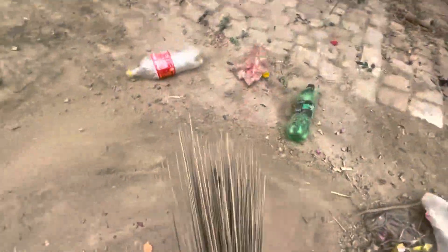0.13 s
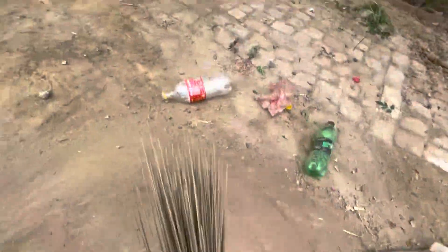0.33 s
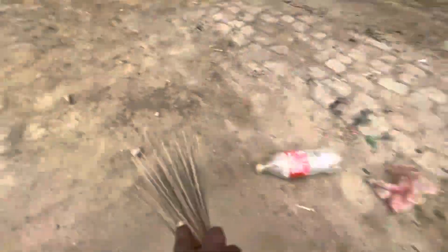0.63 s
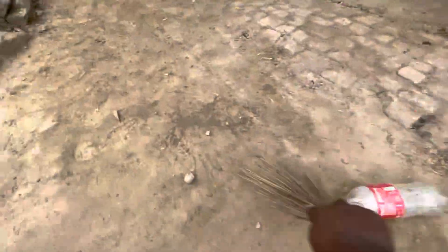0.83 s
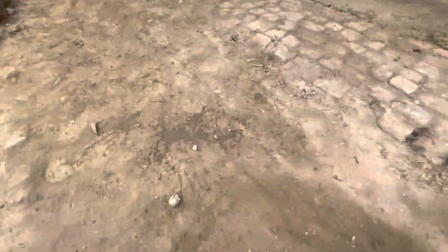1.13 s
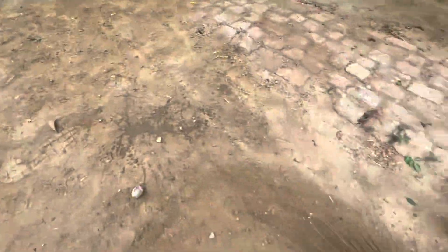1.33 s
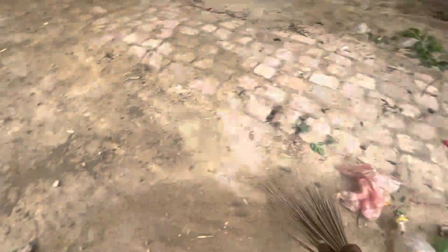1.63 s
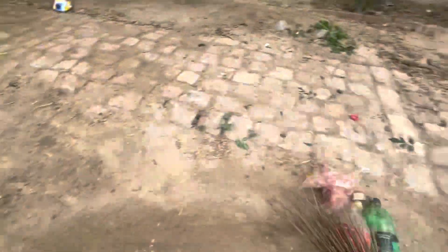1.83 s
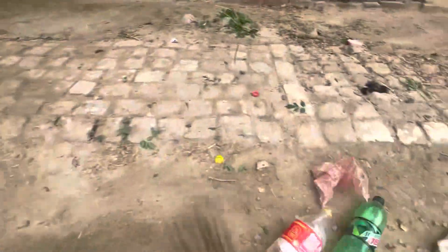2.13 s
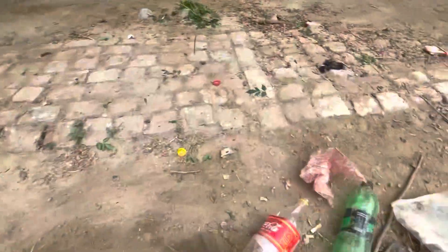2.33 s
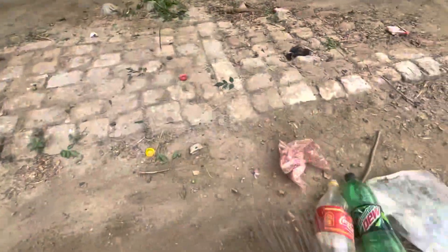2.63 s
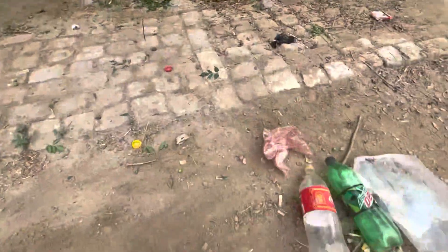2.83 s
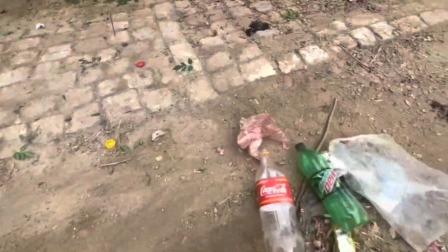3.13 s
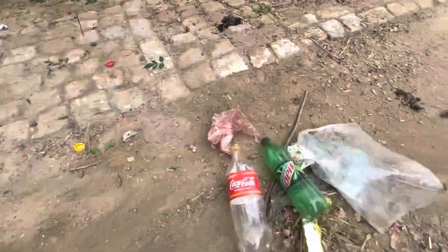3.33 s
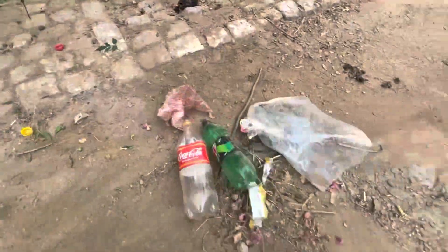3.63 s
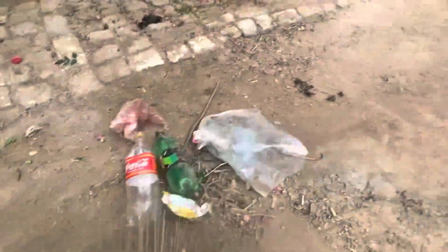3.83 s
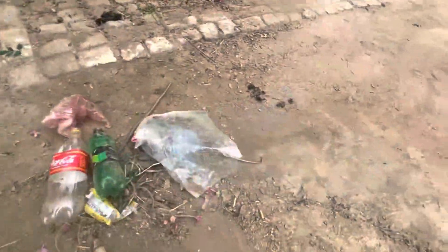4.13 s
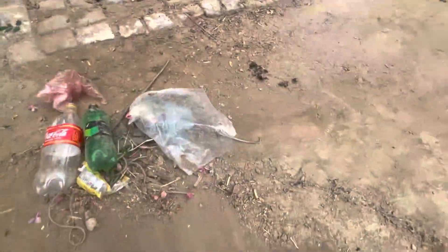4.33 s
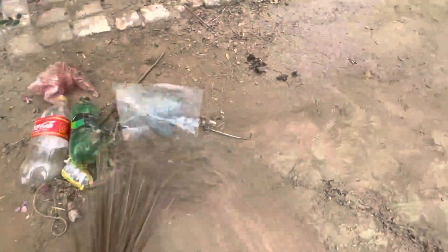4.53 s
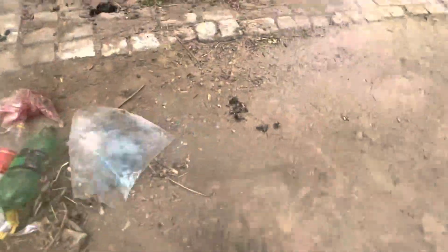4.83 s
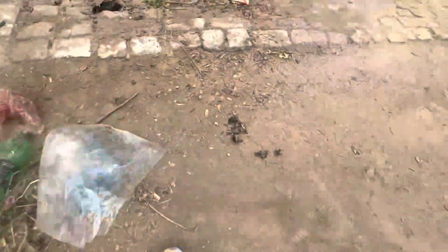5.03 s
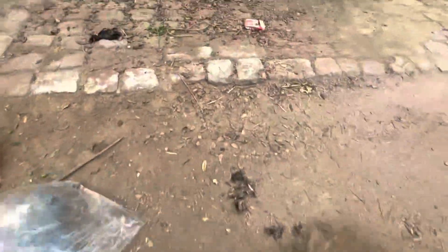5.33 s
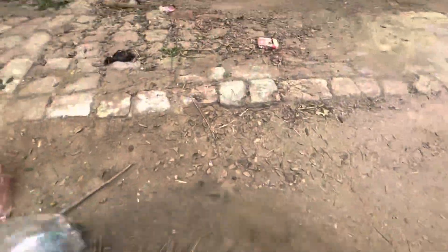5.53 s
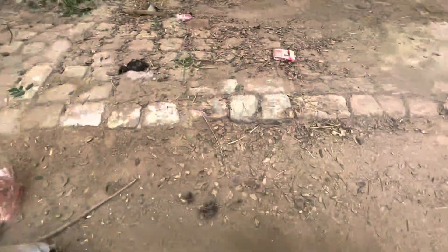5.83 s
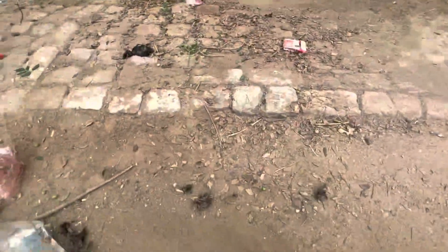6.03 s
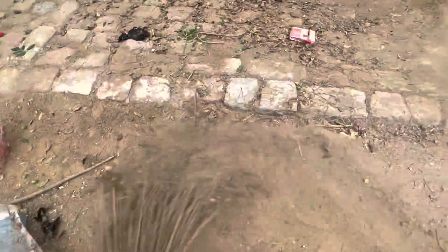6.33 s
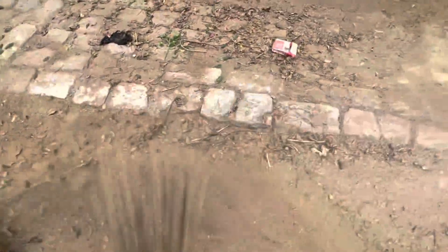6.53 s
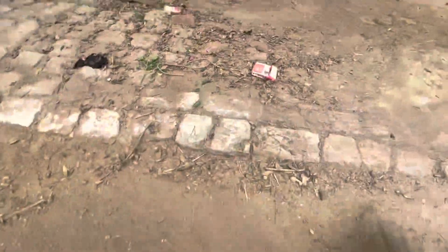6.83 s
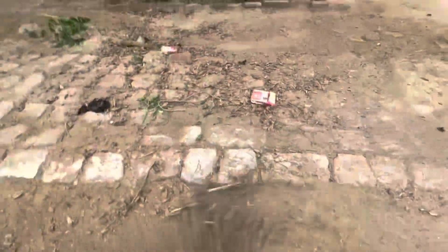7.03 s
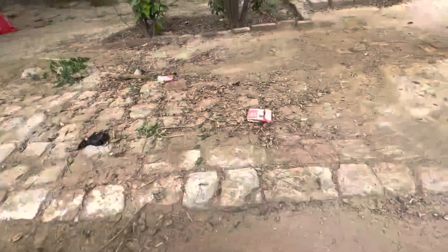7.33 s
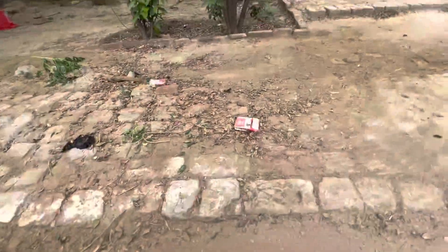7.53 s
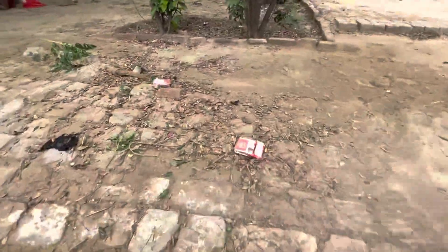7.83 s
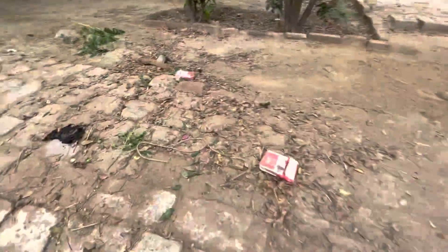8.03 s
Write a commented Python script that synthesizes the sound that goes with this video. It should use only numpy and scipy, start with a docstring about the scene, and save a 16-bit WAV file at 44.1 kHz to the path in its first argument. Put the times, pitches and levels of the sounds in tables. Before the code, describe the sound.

Close stereo, outdoor yard with low soft rumble, faint wavering drone and a slight breeze. At 0 s the broom barely touches; a dull footfall and small scuff come near 0.15 s. A soft growing sweep starts at 0.8 s, and from 0.95 to 1.5 s sticks rap an empty plastic bottle, hollow and crinkly. A second sweep at 1.6 s brings a denser run of bottle knocks around 1.8-2.1 s; another from 2.3 s adds a few to 2.6 s. At 2.9 s a short stroke ends in a sharp clack near 3.06 s. Louder, brighter, raspy strokes follow at 3.5, 4.2, 5.2, 6.1 and 6.8 s, scattering grit and rattling twigs, strongest around 4.5 s, with debris often flung left. Light scuffs fall near 5.06, 5.95 and 7.8 s. After a quieter gap, a final abrupt bright scratch begins at 8.0 s and is cut off.

```python
"""In a dirt and brick courtyard a stiff stick broom sweeps past two close microphone ports in eleven strokes.
Stick-slip friction of the tips makes hiss and rasp; tumbling grit and struck twigs ring as damped modes.
Knocked plastic bottles ring by shell, body and neck air; soles thud and scuff as shaped noise bursts.
Scattered noise tails answer from the yard, over low outdoor rumble, a faint gliding drone and a breeze."""
import sys
import numpy as np
from scipy import signal
from scipy.fft import rfft, irfft
from scipy.io import wavfile
from scipy.ndimage import uniform_filter1d

SR = 44100
rng = np.random.default_rng(int(sys.argv[2]) if len(sys.argv) > 2 else 0)


def output_pcm(signal):
    """Save a mono or channel-first signal as 16-bit PCM at the path in sys.argv[1].

    Samples are clipped to [-1, 1] before scaling.
    """
    pcm = np.clip(np.atleast_2d(signal).T, -1, 1) * 32767
    wavfile.write(sys.argv[1], SR, np.round(pcm).astype(np.int16))


N = 361179
TIME = np.arange(N) / SR
# Levels in the tables are relative: the functions may add offsets of their own.


def from_db(db):
    """Logarithmic level: decibels become an amplitude gain."""
    return 10 ** (np.asarray(db) / 20)


def rms_one(x):
    """Power normalisation: scale to unit mean square."""
    return x / np.sqrt(np.mean(x ** 2) + 1e-20)


def in_time(rows):
    """Linear interpolation: each column of a curve at every sample."""
    s, *columns = np.transpose(rows)
    return [np.interp(TIME, s, c) for c in columns]


def drift(rate):
    """Band-limited random wander: about `rate` knots a second, spread about 1."""
    knots = rng.standard_normal(4096)
    return np.interp(TIME * rate, np.arange(len(knots)), knots) / np.sqrt(2 / 3)


def coloured(x, spectrum):
    """Minimum-phase filtering: the folded cepstrum gives a causal filter with the given spectrum."""
    size = 2 ** 19
    hz, db = np.transpose(spectrum)
    grid = np.maximum(np.fft.rfftfreq(size, 1 / SR), 1)
    gain = from_db(np.interp(np.log(grid), np.log(hz), db))
    cepstrum = irfft(np.log(gain))
    cepstrum[1:size // 2] *= 2
    cepstrum[size // 2 + 1:] = 0
    response = np.exp(rfft(cepstrum))
    return irfft(rfft(x, size) * response)[..., :N]


def ring(x, hz, t60):
    """Damped resonance: a unit click sets one decaying sine of initial height 1 ringing."""
    r = from_db(-60 / (t60 * SR))
    w = 2 * np.pi * hz / SR
    return signal.lfilter([0, np.sin(w)], [1, -2 * r * np.cos(w), r * r], x + 1e-18)


CONTACT_RISE_S = 0.00025


def burst(t60, size=8192):
    """Impact noise: a cluster of tiny contacts builds up at once to about rms 1 and decays."""
    t = np.arange(size) / SR
    rise = 1 - np.exp(-t / CONTACT_RISE_S)
    return rng.standard_normal(size) * from_db(-60 * t / t60) * rise


def add(track, s, sound):
    """Superposition: lay a sound into a track at a time."""
    start = int(np.clip(round(s * SR), 0, N - 1))
    track[start:start + len(sound)] += sound[:N - start]


def grains(per_s, spread_db, t60):
    """Granular friction: random catches of uneven size, each a tiny dying crunch; rms 1."""
    sizes = from_db(spread_db * np.minimum(rng.exponential(1, N), 4))
    power = (rng.random(N) < per_s / SR) * sizes ** 2
    power = signal.lfilter([1], [1, -from_db(-120 / (t60 * SR))], power + 1e-18)
    return rms_one(np.sqrt(power) * rng.standard_normal(N))


def spells(rows, rise_s, fall_s):
    """Contact envelope: gain of short rubs that set in, hold and die away."""
    out = np.zeros(N)
    for s, length_s, db in rows:
        age = np.maximum(TIME - s, 0)
        onset = np.minimum(age / rise_s, 1)
        release = np.exp(-np.clip((age - length_s) / fall_s, 0, 20))
        out += from_db(db) * onset * release
    return out


# broom strokes: touch-down t/s, time to full pressure t/s, time held t/s, time until litter is met t/s,
# scratch level/dB, attenuation at touch-down level/dB, rasp re scratch level/dB, grit level/dB,
# jump on meeting the litter level/dB, fade after lifting dB/s,
# starting place (0 ahead, 1 right; limited to these), swing in places/s (positive is to the right)
STROKES = [(0.0, 0.014, 0.062, 0.008, -49, -50.5, 0.5, -47.5, -16, 44, 0.27, 1),
           (0.797, 0.33, 0.41, 0.18, -31, 1.5, -6, -31, 13.5, 26, 1.64, 1.5),
           (1.565, 0.27, 0.18, .15, -24.5, 9.5, -19, -26, 20, 29, 1, -0.5),
           (2.271, .16, 0.19, 0.13, -25.5, 16.5, -9, -23.5, 19.5, 73, 0.2, 2),
           (2.909, 0.092, 0.14, 0.14, -25.5, 21, 3, -37, 11, 90, 0.21, 1.8),
           (3.512, 0.088, 0.22, 0.23, -16, 9.5, -1, -32.5, 7, 67, 1.15, -4),
           (4.22, 0.21, 0.14, 0.29, -13.5, 14, -0.5, -21, 19, 49.5, 0.41, -1),
           (5.176, 0.26, 0.31, 0.4, -21.5, 6, 0, -30, 2.5, 23, 1.02, -3.5),
           (6.068, .13, 0.34, 0.41, -17.5, 7.5, -6, -35.5, 0, 34, 1.26, -5),
           (6.826, 0.17, 0.39, 0.39, -18, 14.5, -3.5, -30.5, 5.5, 65, 1.15, -4.5),
           (8.016, 0.13, .1, 0.04, -11, 17.5, -22, -43.5, -1, 55, 1.7, 5)]
# tips grazing the ground on the way back: t/s, grit level/dB, t60 t/s
GRAZES = [(0.46, -48, 0.99), (3.325, -43, 0.67), (5.055, -34.5, 0.35), (5.119, -34, 0.093),
          (5.948, -51, 0.53), (7.864, -49, 1)]
GRAZE_SCRATCH_DB = -30   # relative to its grit
LAND_S, EASE_DB_PER_S = 0.032, 48   # the tips land; the pressure eases while the stroke is held
LIFT_DB, LIFT_S = 7.5, 0.043   # the scratch drops as the broom lifts, then fades
GATHER_DB_PER_S, SPILL_DB_PER_S, SETTLE_DB_PER_S = 51.5, 41, 51.5   # grit heaps up, spills aside, comes to rest
RASP_FOLLOWS = 0.74   # share of the heap's level change that bends the sticks


def strokes():
    """Friction follows load: each stroke lands, presses, meets litter and lifts; three gains and the place."""
    scratch, rasp, pushed, place = np.full((4, N), 1e-5)
    for (s, press_s, hold_s, litter_s, db, swell_db, rasp_db, grit_db,
         jump_db, fade_db_per_s, start, swing) in STROKES:
        age = np.maximum(TIME - s, 0)
        landed = np.sin(np.pi / 2 * np.minimum(age / LAND_S, 1)) ** 2
        lifted = np.maximum(age - press_s - hold_s, 0)
        lift_db = LIFT_DB * (1 - np.exp(-lifted / LIFT_S))
        swelling_db = -swell_db * np.maximum(1 - age / press_s, 0)
        easing_db = -EASE_DB_PER_S * np.clip(age - press_s, 0, hold_s)
        pressure_db = swelling_db + easing_db - lift_db - fade_db_per_s * lifted
        # time left before the litter is met, and time spent pushing it
        ahead = np.maximum(litter_s - age, 0)
        past = np.maximum(age - lifted - litter_s, 0)
        heap_db = -GATHER_DB_PER_S * ahead - jump_db * np.minimum(ahead / 0.021, 1) - SPILL_DB_PER_S * past
        scratch += landed * from_db(db + pressure_db)
        rasp += landed * from_db(db + pressure_db + rasp_db + RASP_FOLLOWS * heap_db)
        pushed += landed * from_db(grit_db + heap_db - 0.59 * lift_db - SETTLE_DB_PER_S * lifted)
        place = np.where(TIME >= s, np.clip(start + swing * age, 0, 1), place)
    for s, db, t60 in GRAZES:
        age = np.maximum(TIME - s, 0)
        graze = np.minimum(age / 0.0033, 1) * from_db(db - 60 * age / t60)
        pushed += graze
        scratch += graze * from_db(GRAZE_SCRATCH_DB)
    return scratch, rasp, pushed, uniform_filter1d(place, size=900)


# tips digging in (positive) or skimming (negative): t/s, half width t/s, level/dB
SURGES = [(0.85, 0.025, 2.5), (1.6, 0.041, -4), (3.53, 0.022, -2.5), (3.02, 0.028, -2.5),
          (3.63, 0.016, 2.5), (4.355, 0.041, 3), (4.42, 0.026, -3), (5.51, 0.025, 4), (6.24, 0.023, 2.5),
          (7.015, 0.031, 3), (8.09, .025, 2), (8.15, .035, -1)]


def surges():
    """Load modulation: gain of the broom where the tips dig in for a moment or skim lightly."""
    return from_db(sum(db * np.exp(-((TIME - s) / width_s) ** 2) for s, width_s, db in SURGES))


# spectrum of tips hissing over dust: f/Hz, level/dB
SCRATCH = [(150, -53), (500, -33), (1000, -21), (1900, -13.5), (2700, -12), (4200, -11), (5800, -7),
           (7600, -8), (8700, -1), (9500, 3.5), (10600, -4), (12000, -11), (13700, -30), (15800, -25.5)]
# spectrum of the rasp of bending sticks: f/Hz, level/dB
RASPING = [(150, -59), (600, 0), (1300, -0.5), (2000, 9.5), (3300, -2.5), (5000, 10.5), (7000, 4.5),
           (9500, 6.5), (12000, -17), (15000, -28)]


def stick_tips(scratch, rasp):
    """Stick-slip friction: the tips hiss finely on the dust and judder more coarsely where the sticks bend."""
    per_s = 2200 * (scratch * from_db(23.5)) ** 0.91   # more tips catch as the stroke bears down
    evenness = np.sqrt(np.mean(per_s) / per_s)   # keeps the power level when catches are many or few
    slips = evenness * grains(per_s, spread_db=2.0, t60=0.0051)
    slips = slips + from_db(-2.0) * rng.standard_normal(N)
    hiss = rms_one(coloured(slips, SCRATCH)) * from_db(1.0 * drift(70))
    judders = rms_one(coloured(grains(700, spread_db=4.0, t60=0.0038), RASPING))
    judders = judders * from_db(5.1 * drift(45))
    return (scratch * hiss + rasp * judders) * from_db(-1.5 + 1.86 * drift(35))


# tips skidding hard: t/s, length t/s, level/dB
SKIDS = [(2.377, 0.051, -36), (3.052, 0.015, -20), (6.26, 0.022, -23), (7.31, 0.032, -33)]
# spectrum of a skidding tip: f/Hz, level/dB
SCREECH = [(500, -25), (2000, -5), (4000, -8.5), (6800, 10), (9000, 8), (13000, -43)]


def skids():
    """Stick-slip under heavy load: a few tips judder across a stone or bottle with a sharp, bright scratch."""
    judder = rms_one(coloured(grains(460, spread_db=4.0, t60=0.009), SCREECH))
    return judder * spells(SKIDS, rise_s=0.0046, fall_s=0.0027)


# spectrum of a snagging tip: f/Hz, level/dB
SNAG = [(300, -25), (1000, -11), (2000, 2), (3300, -4.5), (6000, 0), (9000, 8.5), (12000, -17),
        (15500, -12)]
SNAGS_PER_S, SNAG_DB = 90, -17
SNAG_FOLLOWS = 0.8   # share of the scratch's swing in dB


def twig_snags(scratch):
    """Elastic release: single stiff tips snag on crumbs and let go in dry cracks that stand out of the hiss."""
    cracks = rms_one(coloured(grains(SNAGS_PER_S, spread_db=2.5, t60=.0035), SNAG))
    return cracks * from_db(SNAG_DB) * scratch ** SNAG_FOLLOWS


# spectrum of a stray tick: f/Hz, level/dB
STRAY = [(150, -20), (700, 10), (1500, -16), (3500, -5), (6000, -36), (9000, 6), (12000, -6), (15000, -16)]
STRAY_PER_S, STRAY_DB = 36, -35.5
STRAY_FOLLOWS = 0.7   # share of the scratch's swing in dB


def strays(scratch):
    """Sparse random impacts: stray sticks and crumbs tick singly and stand out as the stroke trails away."""
    ticks = rms_one(coloured(grains(STRAY_PER_S, spread_db=-1.0, t60=0.012), STRAY))
    return ticks * from_db(STRAY_DB) * scratch ** STRAY_FOLLOWS


# single sticks flicking free: t/s, level/dB
FLICKS = [(0.7987, -36.5), (0.947, -20), (0.9592, -22), (1.478, -35.5), (1.798, -19), (1.8408, -21),
          (2.2727, -30.5), (2.373, -29), (2.512, -21), (2.913, -37.5), (2.9653, -23), (3.047, -28),
          (3.094, -31), (3.621, -20), (3.737, -21), (4.0145, -31), (4.09, -47), (4.111, -36.5),
          (5.121, -35), (5.179, -32.5), (6.074, -28.5), (6.194, -20.5), (6.221, -28), (6.621, -30),
          (6.745, -30.5), (7.57, -30.5)]


def flicks():
    """Elastic release: a bent stick springs free with a bright tick."""
    out = np.zeros(N)
    for s, db in FLICKS:
        add(out, s, from_db(db + 15.5) * burst(t60=0.024))
    return coloured(out, SCRATCH)


# spectrum of tumbling grit: f/Hz, level/dB
GRIT = [(80, -21.5), (250, -0.5), (480, -8.5), (800, -2.5), (1200, -2), (2000, 1), (3200, -7), (5000, -6.5),
        (9000, -10), (15000, -104)]


def grit():
    """Random impacts on small resonators: crumbs and chaff crunch, and hits ring at one of 24 pitches."""
    pitches = np.geomspace(450, 4200, num=24)
    sizes = from_db(3.9 * np.minimum(rng.exponential(1, N), 4)) * rng.choice([-1, 1], N)
    hits = sizes * (rng.random(N) < 600 / SR)
    dealt = rng.integers(0, len(pitches), N)   # which pitch each hit excites
    pings = sum(ring(hits * (dealt == k), hz, 18 / hz) * np.sqrt(hz) for k, hz in enumerate(pitches))
    crunch = grains(450, spread_db=3.5, t60=0.036)
    rattle = rms_one(coloured(crunch + from_db(-7.5) * rms_one(pings), GRIT))
    return rattle * from_db(1 + 2.4 * drift(25))


# twigs, pebbles and litter struck by the broom, and one low knock of a foot (5.706 s): t/s, ring level/dB,
# centre of the modes f/Hz, snap level/dB
CLACKS = [(0.171, -34.5, 1360, -54), (0.549, -41, 1130, -39.5), (1.198, -28.5, 2590, -38),
          (1.298, -35, 1320, -22), (1.313, -32, 1470, -23.5), (1.33, -33, 1440, -27.5),
          (1.383, -35, 730, -27.5), (1.703, -34, 2780, -26.5), (2.377, -36, 935, -21.5),
          (2.79, -42.5, 617, -32), (3.058, -18, 1503, -16), (3.069, -14.5, 1535, -20),
          (3.326, -26, 1700, -26), (3.728, -27.5, 988, -37), (3.823, -21.5, 1330, -19.5),
          (3.835, -20.5, 1020, -38), (3.867, -52, 1070, -18.5), (3.922, -50, 2000, -18.5),
          (3.93, -22.5, 950, -45), (3.935, -22, 724, -48), (4.015, -32, 1130, -28.5),
          (4.486, -37, 1590, -13.5), (4.527, -10.5, 1040, -33), (4.543, -13, 1390, -16),
          (4.612, -13.5, 1080, -25), (4.755, -34, 754, -20.5), (5.504, -16, 1815, -35),
          (5.539, -20, 1790, -33), (5.579, -19, 2030, -38), (5.685, -26.5, 1840, -45),
          (5.706, -32, 262, -46), (5.732, -27, 2400, -27), (5.917, -36, 1760, -42),
          (6.311, -30.5, 1620, -42), (6.591, -37, 320, -30.5), (5.954, -36, 1730, -25.5),
          (6.413, -26, 1610, -51), (6.44, -27.5, 1050, -32), (6.721, -50, 1520, -35.5),
          (7.171, -29.5, 566, -52), (7.208, -23.5, 965, -38), (7.277, -26, 1200, -38),
          (7.57, -35, 2100, -40), (7.355, -31, 794, -21.5), (7.795, -36, 1520, -29.5),
          (7.865, -35.5, 635, -43), (7.885, -42, 700, -52)]
# spectrum of the snap: f/Hz, level/dB
SNAP = [(100, -9), (400, -4.5), (900, -3), (2000, 2.5), (4000, -2.5), (9000, -4.5), (15000, -75)]


def clacks():
    """Damped modal cluster: a struck twig or scrap snaps, then rattles briefly on seven modes."""
    rings, snaps = np.zeros(N), np.zeros(N)
    for s, db, hz, snap_db in CLACKS:
        octaves = np.linspace(-.45, .65, num=7) + rng.normal(0, 0.08, 7)
        body = sum(ring(burst(t60=.008), hz * 2 ** o, .024) * from_db(-18 * abs(o)) for o in octaves)
        body = np.diff(body, prepend=0)   # tilts towards the treble
        add(rings, s, from_db(db + 8) * body / np.max(np.abs(body)))
        add(snaps, s, from_db(snap_db + 6.5) * burst(t60=0.034))
    return rings + coloured(snaps, SNAP)


# lumps of earth rolling, and a sole shifting now and then: t/s, length t/s, level/dB
CLODS = [(0.545, 0.0091, -56), (0.69, 0.12, -56), (3.325, .012, -40), (3.36, 0.017, -56),
         (5.915, 0.0078, -48), (3.62, 0.027, -44), (3.73, 0.13, -43), (4.73, 0.08, -41), (5.54, 0.059, -45),
         (6.27, 0.25, -52), (7.172, 0.018, -29.5), (7.21, 0.15, -42.5)]
# spectrum of a lump of earth: f/Hz, level/dB
CLOD = [(80, -16.5), (200, 2.5), (380, -4.5), (600, 0), (1000, -17), (3000, -28)]


def clods():
    """Rolling contact: lumps of earth are nudged and roll, or a sole shifts, with a dull rumble."""
    tumble = rms_one(coloured(grains(160, spread_db=0.5, t60=0.052), CLOD))
    return tumble * spells(CLODS, rise_s=0.0091, fall_s=0.0099)


# knocks on bottles: t/s, shell level/dB, neck air level/dB, body level/dB, pitch of the spot struck f/Hz
KNOCKS = [(0.953, -14.5, -73, -59, 1070), (1.034, -10, -44, -28.5, 415), (1.099, -40, -43, -38, 270),
          (1.13, -17.5, -50, -34, 270), (1.239, -22, -57, -66, 1020), (1.423, -26, -49, -51, 675),
          (1.445, -22, -58, -38, 276), (1.481, -22, -38, -21, 273), (1.758, -35, -46, -35, 630),
          (1.815, -11.5, -42, -25.5, 807), (1.873, -7, -59, -24.5, 905), (1.936, -6, -30.5, -17, 1140),
          (1.946, -11.5, -51, -37, 766), (2.051, -22, -36.5, -47, 980), (2.084, -20, -36.5, -29, 970),
          (2.213, -23.5, -45, -36.5, 1142), (2.442, -18, -38.5, -27, 770), (2.512, -11, -29, -24, 714),
          (2.628, -24, -34, -37, 434)]
# modes of an empty plastic bottle (neck air, three of the body, then shell): f/Hz, level/dB, t60 t/s
BOTTLE_MODES = [(110, 1.5, .6), (272, -6, .1), (370, -7, .06), (430, -2, .075), (660, -17, .035),
                (765, -11, .07), (980, -12, .035), (1140, -12, .022), (1410, -12, .025), (1680, -13, .02),
                (2040, -13, .015), (2450, -13, .015), (3240, -12, .015), (3900, -15, .012)]
# spectrum of the shell skidding on grit: f/Hz, level/dB
SKID = [(100, -27), (300, -18), (750, 7), (1200, 13), (2000, 21), (3400, 13.5), (6000, 11), (15000, -71)]
SPOT_DB, SPOT_OCTAVES = 11, 0.13   # modes near the pitch of the spot ring louder


def bottles():
    """Modal and cavity resonance: each knock rings the shell, flexes the body and sets the neck air booming."""
    out, crinkle = np.zeros(N), np.zeros(N)
    click = signal.unit_impulse(SR)
    for s, shell_db, neck_db, body_db, spot_hz in KNOCKS:
        luck = rng.standard_normal((len(BOTTLE_MODES), 2))
        for k, (hz, mode_db, t60) in enumerate(BOTTLE_MODES):
            if k == 0:
                part_db = neck_db + 8.0
            elif k < 4:
                part_db = body_db + 3.0
            else:
                part_db = shell_db + 2 * luck[k, 0]
            part_db += SPOT_DB * np.exp(-(np.log2(hz / spot_hz) / SPOT_OCTAVES) ** 2)
            # dents shift the pitch of body and shell, not of the air
            dent = 1 + .022 * luck[k, 1] * (k > 0)
            add(out, s, (-1) ** k * from_db(part_db + mode_db) * ring(click, hz * dent, t60))
        # the shell skids on over the grit after the knock
        skidding = burst(t60=0.044) + from_db(-10.5) * burst(t60=0.059)
        add(crinkle, s, from_db(shell_db - 19.5) * skidding)
    # no deep bass below the boom of the neck
    no_bass = signal.butter(2, 85, "high", fs=SR, output="sos")
    return signal.sosfilt(no_bass, out + coloured(crinkle, SKID))


# the broom shoving the bottles: t/s, length t/s, level/dB
SHOVES = [(0.943, 0.038, -21.5), (1.0, 0.14, -39), (1.71, 0.073, -38), (1.797, 0.089, -21),
          (1.96, .03, -40), (2.375, 0.063, -25), (2.5, 0.073, -27.5), (3.04, 0.053, -31)]
# spectrum of a stick on thin plastic: f/Hz, level/dB
RAP = [(150, -33), (520, -12), (720, 7.5), (950, 7), (1500, -3), (3000, 4), (6000, -3), (9000, -1),
       (14000, -29)]


def patter():
    """Repeated impact: sticks rap on the thin plastic while the broom shoves the bottles along."""
    raps = grains(200, spread_db=2.6, t60=.0035)
    return rms_one(coloured(raps, RAP)) * spells(SHOVES, rise_s=0.0037, fall_s=0.0094)


# shoe scuffs: t/s, length t/s, level/dB
SCUFFS = [(0.158, 0.027, -46.5), (0.52, 0.041, -54), (5.055, 0.028, -37.5), (5.948, 0.05, -41.5),
          (7.776, 0.019, -33.5), (7.812, 0.014, -38), (7.895, 0.094, -53)]
# spectrum of a scuff: f/Hz, level/dB
SCUFF = [(150, -42), (600, -7), (1500, 6), (2200, -11), (2900, -6), (6000, -20), (9000, -7), (12000, -33)]


def scuffs():
    """Granular shear: a sole twists on the grit with a soft, dull crunch."""
    crunch = rms_one(coloured(grains(700, spread_db=4.0, t60=0.017), SCUFF))
    return crunch * spells(SCUFFS, rise_s=0.0089, fall_s=0.0054)


# footfalls on packed earth: t/s, level/dB
STEPS = [(0.126, -29.5), (0.144, -30), (5.707, -42)]
# spectrum of a footfall: f/Hz, level/dB
THUD = [(25, -27), (50, 5), (80, -0.5), (130, -1), (200, -18), (320, -29), (1000, -34), (4000, -56)]


def steps():
    """Soft impact: a sole thuds on the earth as a bass-heavy burst."""
    out = np.zeros(N)
    for s, db in STEPS:
        add(out, s, from_db(db + 25.5) * burst(t60=0.23))
    return coloured(out, THUD)


# phase lead of the left port over the right: f/Hz, phase/rad with the source right, ahead, left
LEADS = [(0, 0, 0, 0), (500, -1.6, -.4, 1.7), (1000, -2.4, -.5, 2.4), (2000, -2.7, -.6, 1.6),
         (2500, -3.9, -1.9, 2.1), (3150, -5.9, -3.3, 3.2), (3700, -7, -5, 1.9), (4300, -8.7, -6.3, .2),
         (5000, -10.3, -7.8, -.4), (6000, -12.5, -10.8, -3.7), (6700, -14.2, -13, -4.7),
         (7400, -14.3, -13.9, -7.4), (8400, -13.1, -13.1, -6.8)]
# balance: f/Hz, left re right level/dB with the source right, the same on the left, shading on the left level/dB
SIDES = [(150, 5.5, 0.71, -2), (880, -9, 8, 1), (1900, 0, 1.4, -1), (3030, 1.5, 0.55, -1.5),
         (4670, -6.5, 0.58, -3), (9800, 7.5, 0.45, -5)]


def at_ports(x, place, flung=0):
    """Interaural-style cues: phase lead and balance follow the place; while flung, all is heard from the left."""
    hz, s, frames = signal.stft(x, SR, nperseg=256, noverlap=128)
    to_left = np.interp(s, TIME, flung + np.zeros(N)) > .5
    place = np.clip(np.interp(s, TIME, place), -.3, 1.3)

    def at_bins(rows):
        """Linear interpolation: each column of a table at the frequency bins."""
        f, *columns = np.transpose(rows)
        return [np.interp(hz, f, c)[:, None] for c in columns]

    right, ahead, left = at_bins(LEADS)
    lead = np.where(to_left, left, ahead + (right - ahead) * place)
    pan_right, pan_left, shade = at_bins(SIDES)
    pan_db = np.where(to_left, pan_left, pan_right * place)
    heard = [frames * from_db(shade * to_left + side * pan_db / 2) * np.exp(1j * side * lead / 2)
             for side in (1, -1)]
    return signal.istft(np.array(heard), SR, nperseg=256, noverlap=128)[1][:, :N]


SCATTER_ABOVE_HZ = 400


def courtyard(x, t60, wet_db):
    """Diffuse scattering: ground and walls return a different short tail to each port; the bass escapes."""
    t = TIME[:SR // 2]
    tail = rng.standard_normal((2, len(t))) * from_db(-60 * t / t60) * (1 - np.exp(-t / 0.000083))
    tail /= np.sqrt(np.sum(tail ** 2, axis=1, keepdims=True))
    no_bass = signal.butter(2, SCATTER_ABOVE_HZ, "high", fs=SR, output="sos")
    scattered = signal.sosfilt(no_bass, x)
    return from_db(wet_db) * signal.fftconvolve(scattered[None], tail, axes=1)[:, :N]


# spectrum of the distant rumble: f/Hz, level/dB
YARD = [(20, -37), (50, -10), (90, 5.5), (150, -2.5), (260, -8.5), (500, -18), (1200, -22.5), (3000, -25.5),
        (6000, -30), (9000, -26.5), (11000, -62), (16000, -52)]
# a faint far-off drone: t/s, f/Hz, level/dB
DRONE = [(0, 208, -50.5), (.7, 164, -53.5), (1.4, 150, -49), (2.9, 186, -56), (3.5, 191, -54),
         (4.2, 203, -58.5), (5.2, 209.3, -54.5), (5.7, 161, -52), (7.1, 134.1, -56.5), (8.19, 151, -54)]
# air moving over the ports: t/s, level/dB
BREEZE = [(0.0, -52.5), (0.62, -68.5), (0.96, -88), (3.31, -68.5), (6.38, -66.5), (6.5, -70), (8.19, -66.5)]
# spectrum of the breeze: f/Hz, level/dB
WIND = [(15, -29), (28, -17), (45, 0.5), (70, -11), (130, -9.5), (400, -75)]


def outdoors():
    """Partial coherence: rumble half shared by the ports, a drone in both, and separate breeze noise in each."""
    air = rng.standard_normal(N) + 1.0 * rng.standard_normal((2, N))
    rumble = from_db(-48.0 + 0.42 * drift(3.7)) * rms_one(coloured(air, YARD))
    hz, db = in_time(DRONE)
    phase = 2 * np.pi * np.cumsum(hz * (1 + .006 * drift(6))) / SR
    drone = from_db(db + 2 * drift(7)) * np.sin(phase)
    breeze_db, = in_time(BREEZE)
    breeze = from_db(breeze_db + 17.5) * rms_one(coloured(rng.standard_normal((2, N)), WIND))
    no_bass = signal.butter(2, 35, "high", fs=SR, output="sos")
    return rumble + drone + signal.sosfilt(no_bass, breeze)


# spans when litter and bottles are heard from the left (none if the end precedes the start): from t/s, to t/s
FLUNG = [(3.8, 4), (4.5, 5.12), (5.48, 5.98), (6.38, 7), (7.15, 7.77), (7.85, 7.2)]
FAN_PLACES = 0.24   # half the width of the fan of sticks, in places


def scene():
    """Superposition: broom, litter, bottles and feet in the yard."""
    scratch, rasp, pushed, place = strokes()
    dug = surges()
    # two independent halves spread the fan of sticks
    halves = [stick_tips(scratch * dug, rasp * dug) / np.sqrt(2) for _ in range(2)]
    broom = at_ports(halves[0], place - FAN_PLACES) + at_ports(halves[1], place + FAN_PLACES)
    ticks = strays(scratch) + twig_snags(scratch * dug) + flicks() + skids()
    litter = pushed * grit() + ticks + clacks() + scuffs() + clods()
    tumbling = bottles() + patter()
    flung = sum((TIME >= start) & (TIME < end) for start, end in FLUNG)
    echoes = courtyard(sum(halves) + litter, t60=0.28, wet_db=-7.5)
    echoes = echoes + courtyard(tumbling, t60=0.32, wet_db=-2.0)
    return broom + at_ports(litter + tumbling, place, flung) + echoes + steps() + outdoors()


# colour of the two microphone ports: f/Hz, left level/dB, right level/dB
PORTS = [(100, 0, 0), (600, 0, 0), (1400, .5, -1), (2000, 2, -2.5), (2600, -.5, -1), (3300, .5, 1),
         (4200, -.5, 0), (5000, -1, 2), (6200, -2.5, 3.5), (7300, -2.5, 3.5), (8000, 1, 2), (8800, 0, 0)]
SHARED_ABOVE_HZ, SHARED_LAG_S = 7900, .00029
CUTOFF_HZ = 15750


def record(dry):
    """Linear filtering: each port has its colour; the high treble is shared, late and inverted on the right."""
    size = 2 ** 19
    ports, hz = np.array(PORTS), np.fft.rfftfreq(size, 1 / SR)
    left, right = rfft([coloured(dry[k], ports[:, [0, k + 1]]) for k in range(2)], size)
    shared = 1 / (1 + np.exp((SHARED_ABOVE_HZ - hz) / 250))
    late = -left * np.exp(-2j * np.pi * hz * SHARED_LAG_S)
    right = np.sqrt(1 - shared) * right + np.sqrt(shared) * late
    wave = np.clip(irfft([left, right])[:, :N], -1, 1)
    low_pass = signal.ellip(10, .1, 80, CUTOFF_HZ, fs=SR, output="sos")
    return signal.sosfilt(low_pass, wave)


dry = scene()
out = record(dry)
output_pcm(out)
```